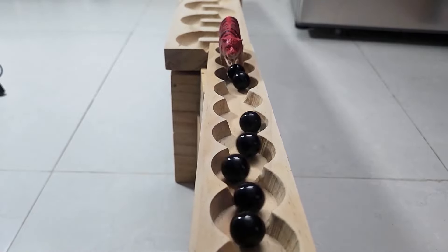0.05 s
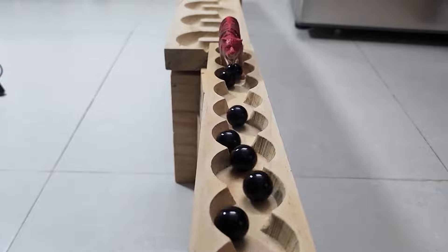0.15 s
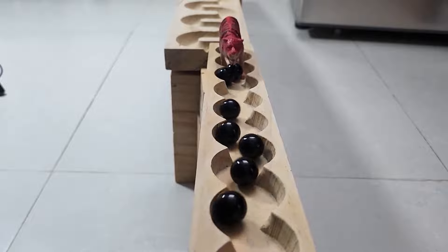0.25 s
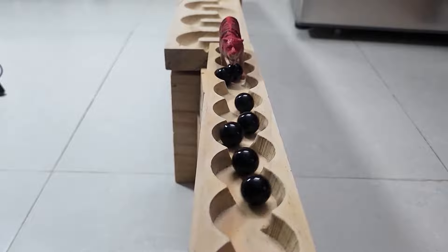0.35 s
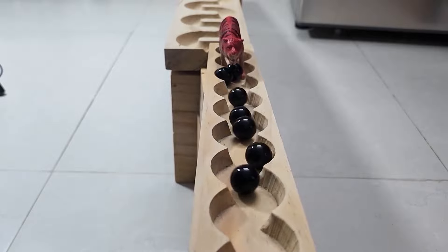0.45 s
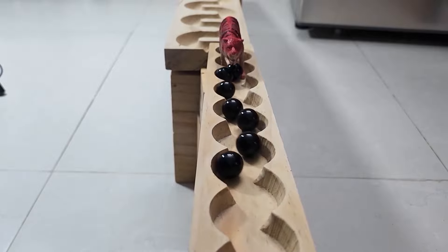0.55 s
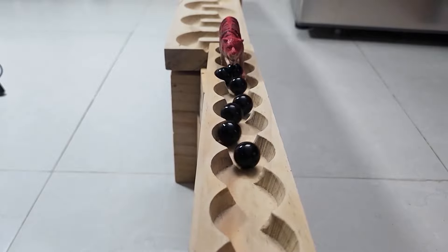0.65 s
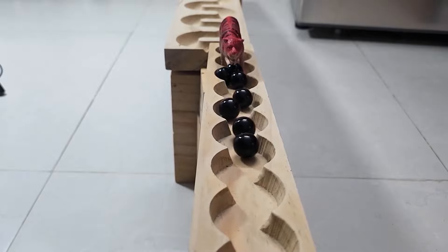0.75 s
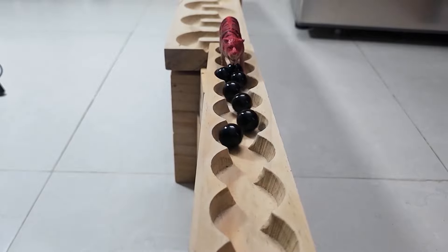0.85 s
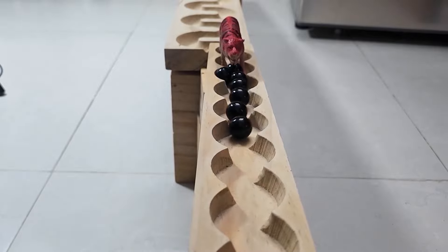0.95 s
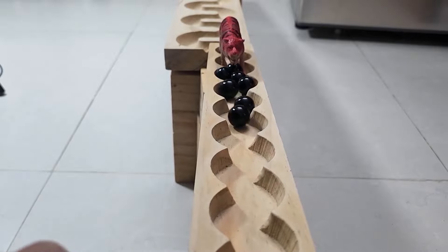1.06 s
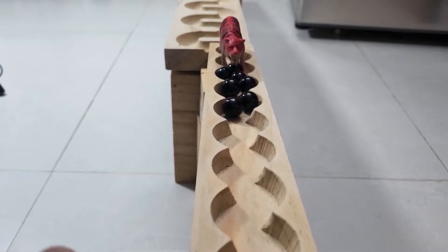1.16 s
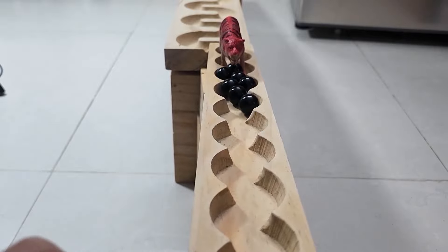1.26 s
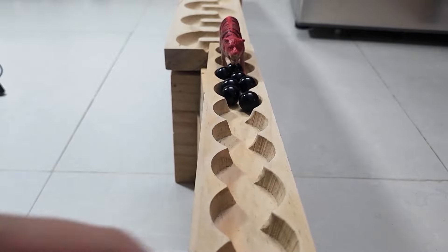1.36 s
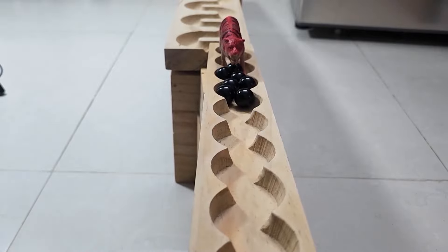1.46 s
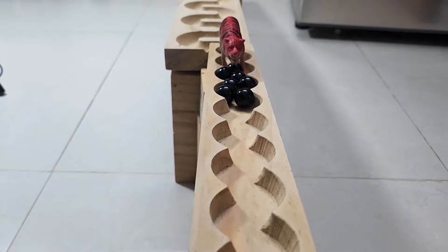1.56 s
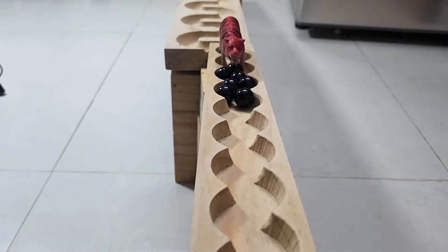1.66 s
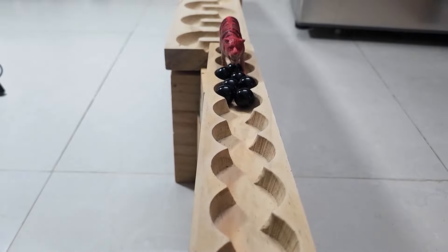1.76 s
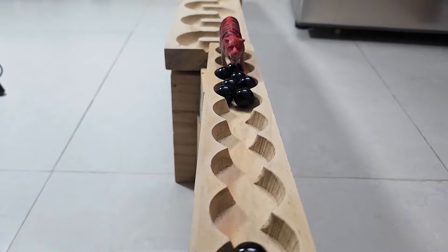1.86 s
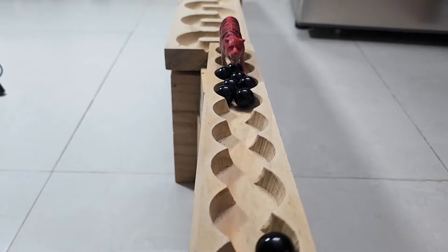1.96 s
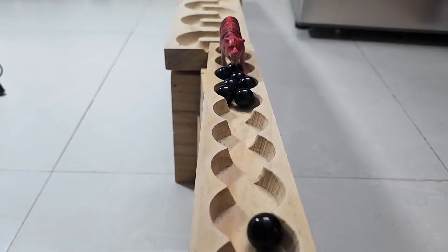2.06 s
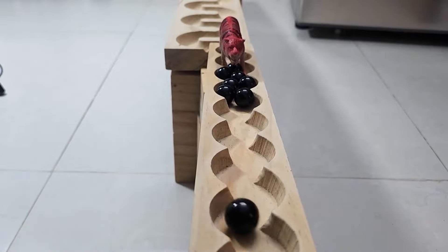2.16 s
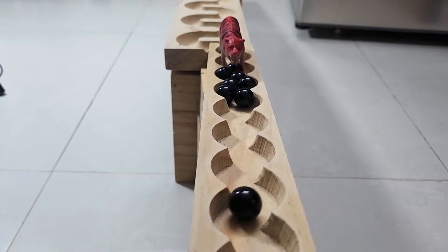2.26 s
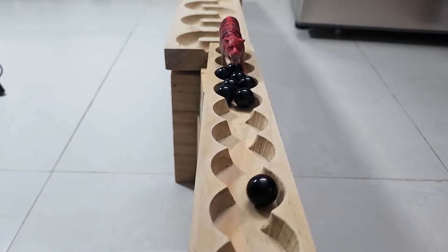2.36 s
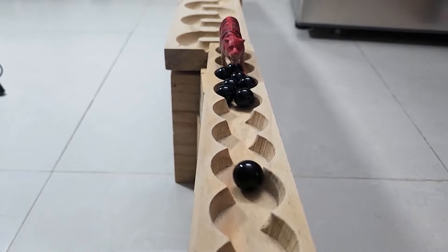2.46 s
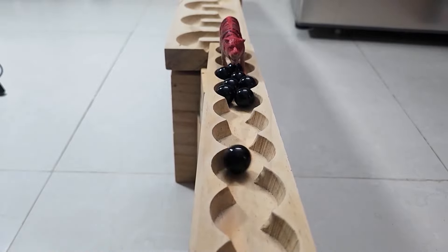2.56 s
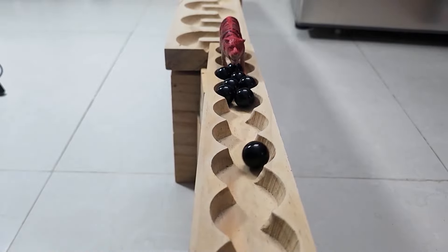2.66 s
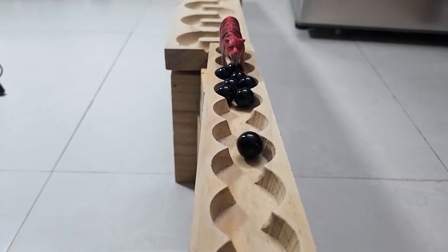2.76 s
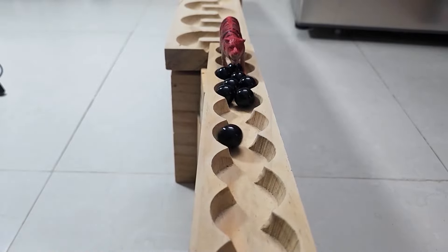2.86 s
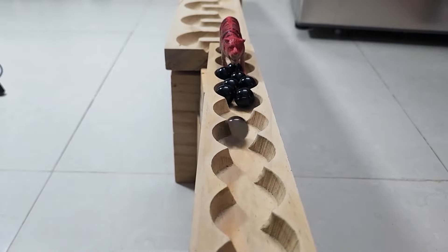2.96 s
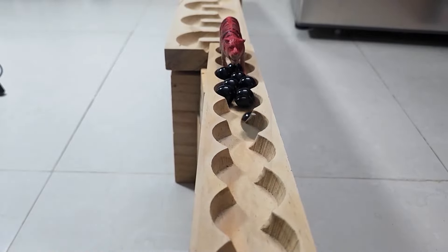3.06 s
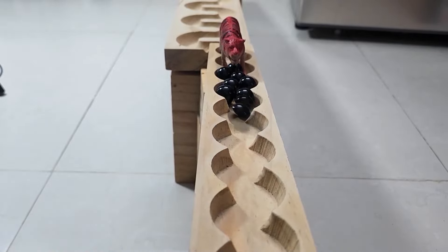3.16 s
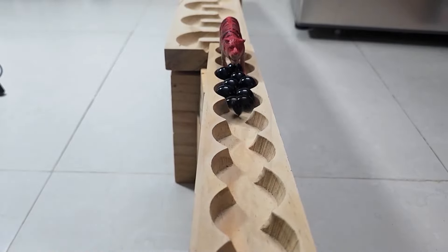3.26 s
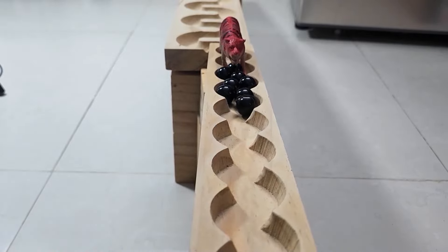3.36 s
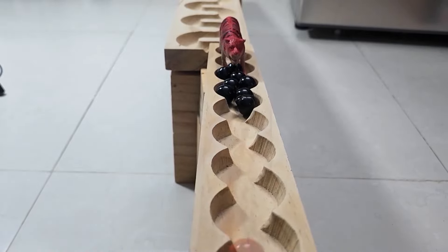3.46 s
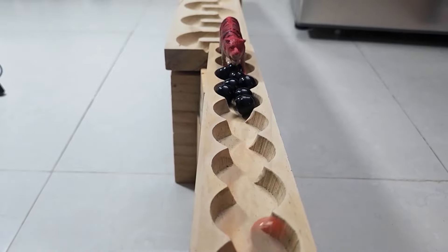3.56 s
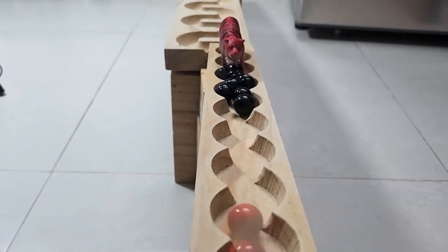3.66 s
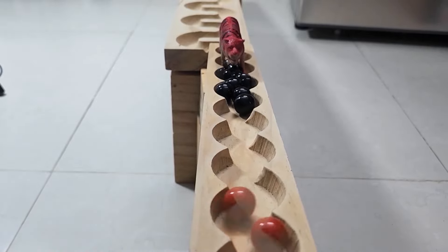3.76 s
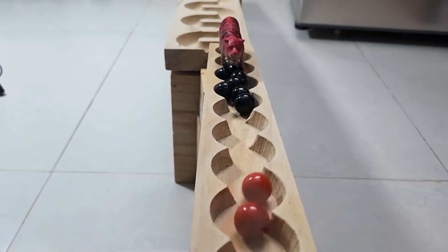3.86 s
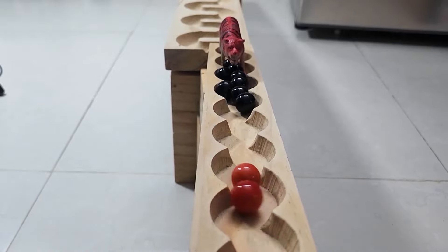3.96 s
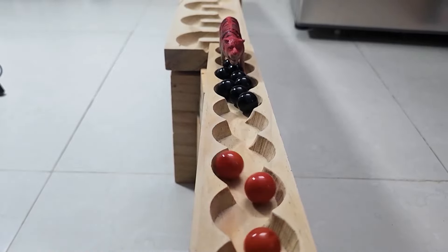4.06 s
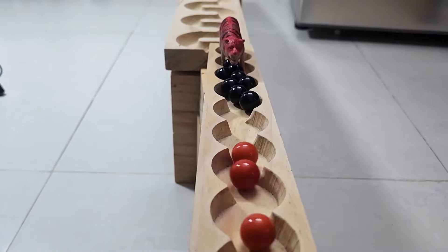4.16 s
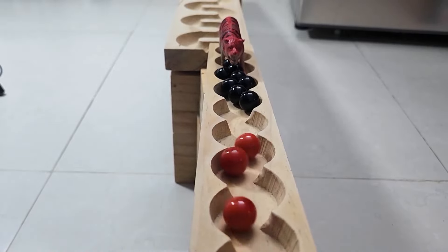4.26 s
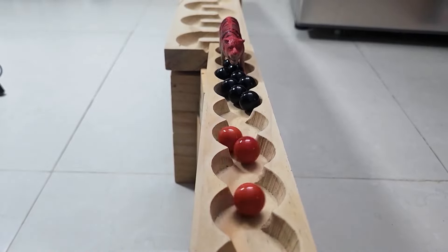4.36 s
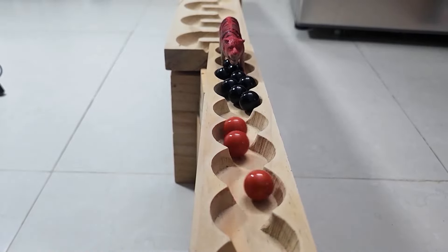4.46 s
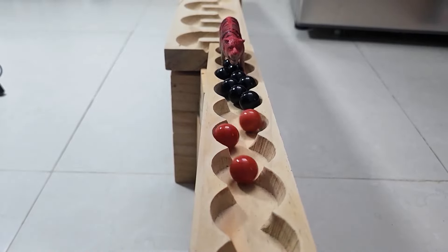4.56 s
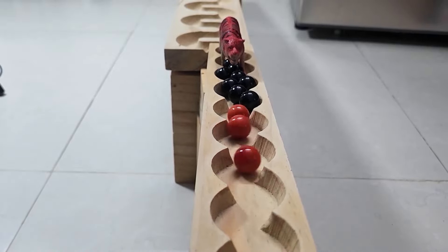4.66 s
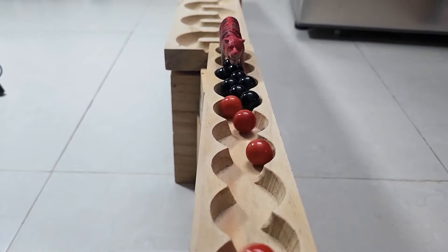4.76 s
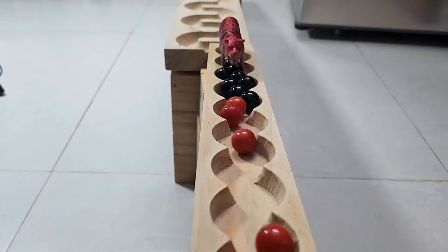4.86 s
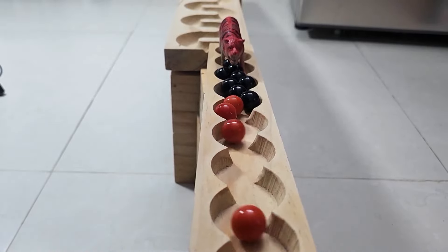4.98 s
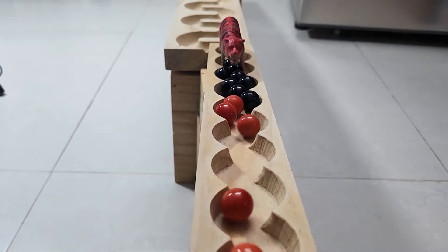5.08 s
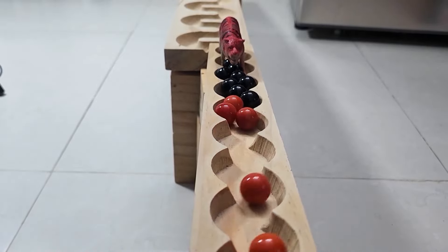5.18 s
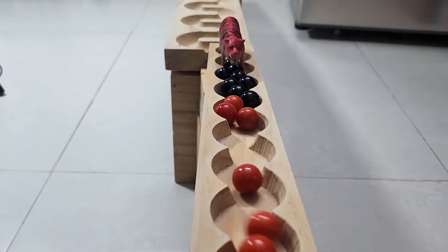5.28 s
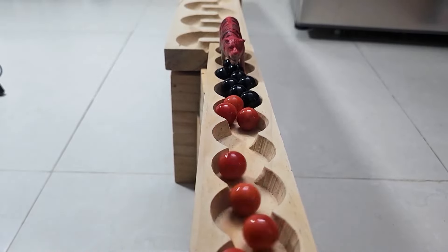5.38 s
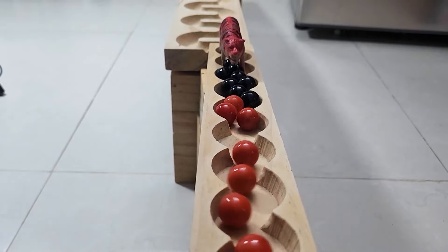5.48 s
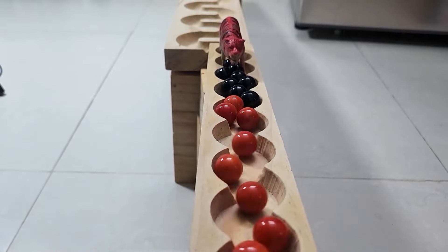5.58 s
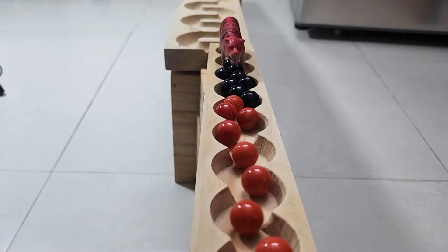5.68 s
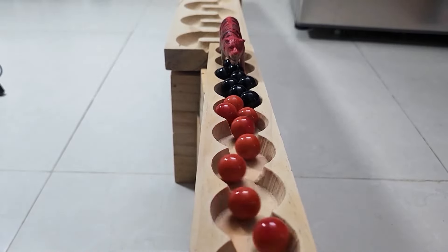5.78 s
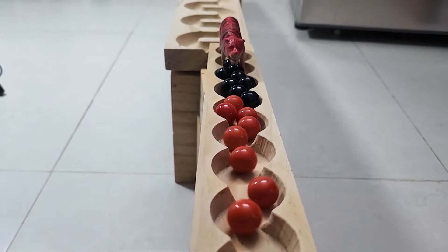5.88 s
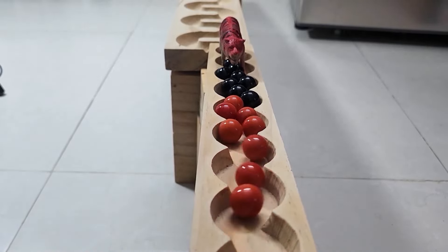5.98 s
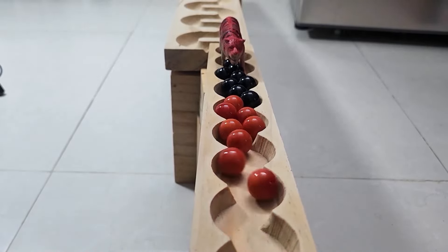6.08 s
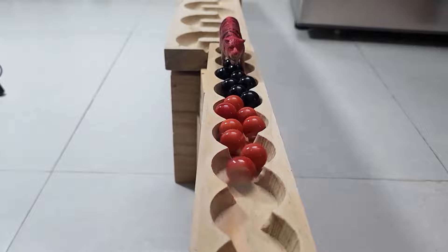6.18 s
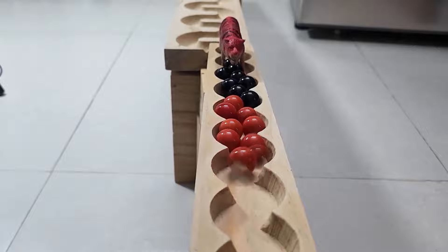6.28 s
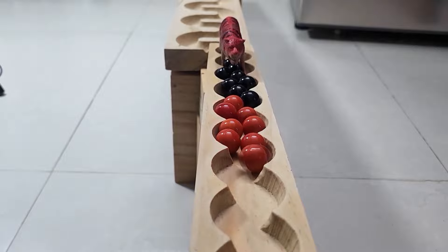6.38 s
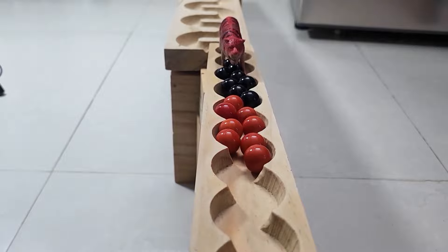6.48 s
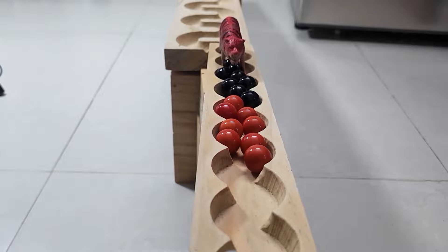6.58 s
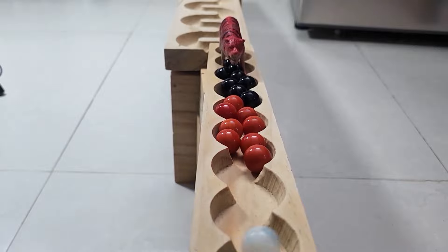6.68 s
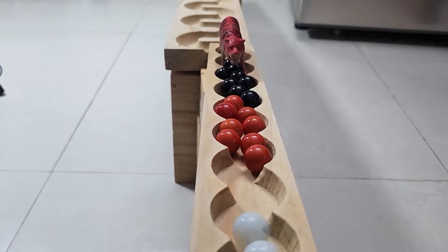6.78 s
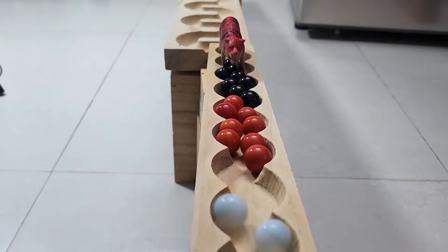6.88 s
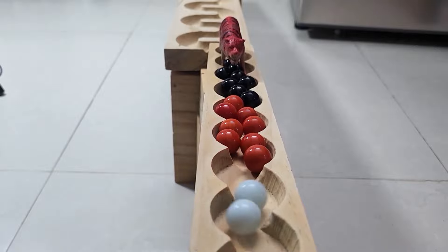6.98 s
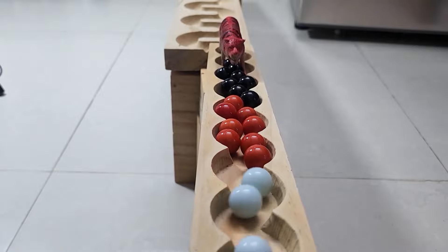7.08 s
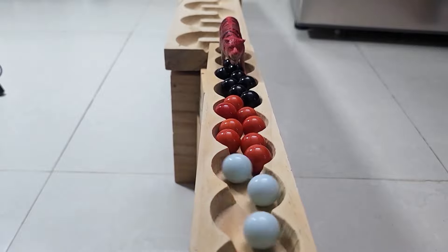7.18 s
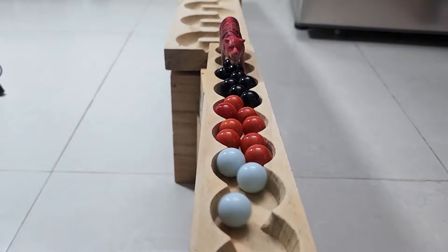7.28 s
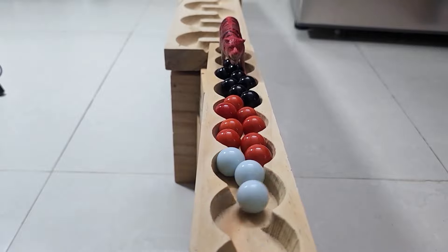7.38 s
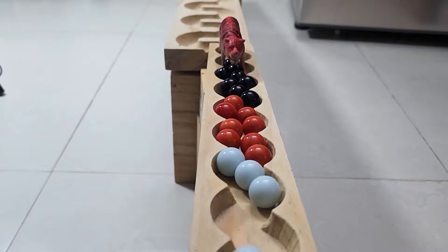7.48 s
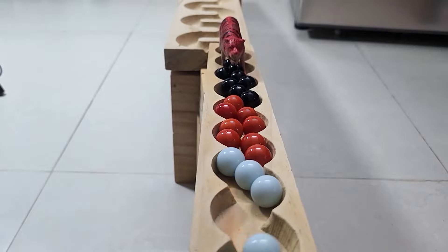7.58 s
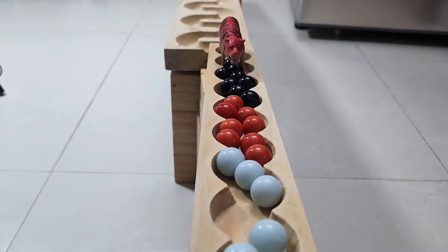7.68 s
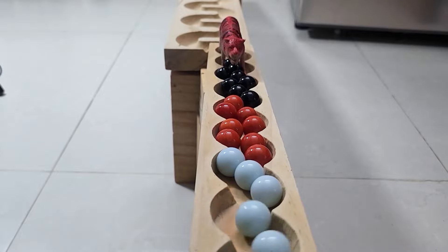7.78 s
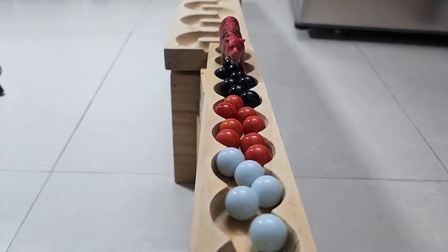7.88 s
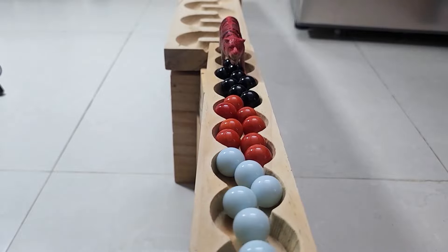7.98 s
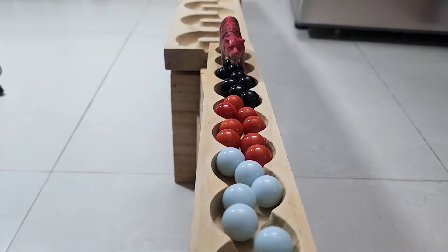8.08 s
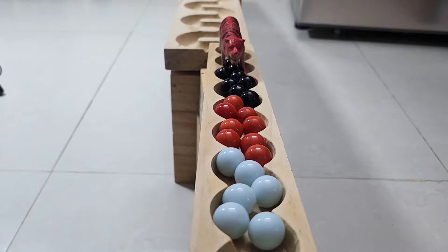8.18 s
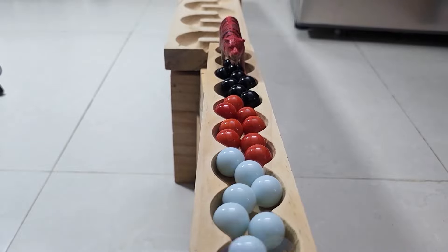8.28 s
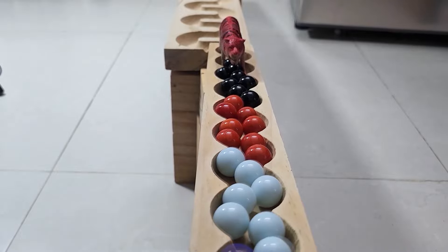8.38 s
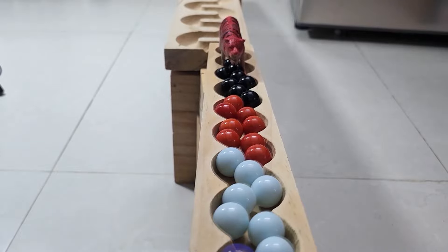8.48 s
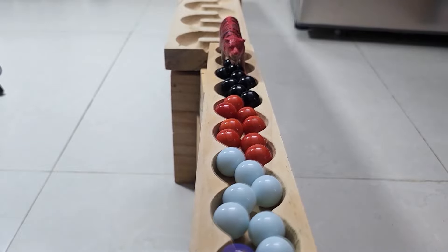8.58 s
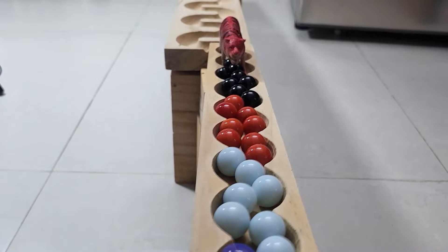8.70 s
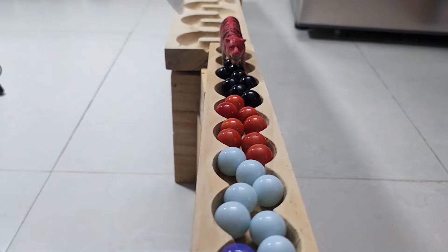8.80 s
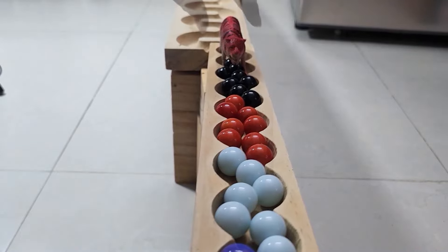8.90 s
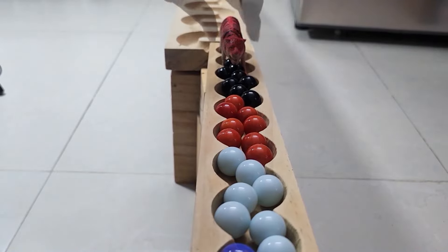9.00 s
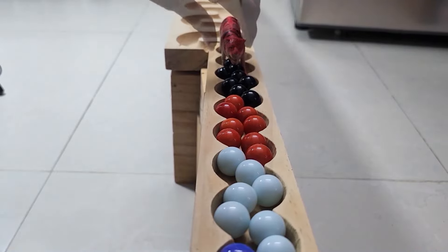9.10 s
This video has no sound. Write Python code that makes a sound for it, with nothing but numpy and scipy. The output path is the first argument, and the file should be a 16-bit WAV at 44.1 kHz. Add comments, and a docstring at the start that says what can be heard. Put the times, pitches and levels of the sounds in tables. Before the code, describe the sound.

Marbles tumble down a wooden zigzag run with quick dry knocks, a faint rumble and sharp glassy clicks as they meet. Between runs, marbles are rummaged and picked from a hollow container, chattering and thudding. New handfuls drop onto the plank and bounce, each run fading as it rolls away. Near stereo microphone, short hard-room reverberation, steady low-humming background.

```python
"""Marbles on a wooden track

Marbles zigzag down a grooved wooden track in a tiled room, close to a stereo microphone.
They rumble along the groove (random tiny impacts through plank resonances), knock on the wall at each bend
(a short push, damped tones and a judder) and click into the queue at the far end (brief bright pulses).
Now and then marbles are stirred and picked from a hollow tub, with chatter, rumble and dull resonant thuds.
A diffuse room tail and steady, low-humming background noise surround them."""
import sys
import numpy as np
from scipy import signal
from scipy.fft import rfft, irfft
from scipy.io import wavfile

SR = 44100
rng = np.random.default_rng(int(sys.argv[2]) if len(sys.argv) > 2 else 0)


def int16_out(signal):
    """Quantize to a 16-bit WAV file."""
    q = np.round(np.clip(np.atleast_2d(signal).T, -1, 1) * 32767)
    wavfile.write(sys.argv[1], SR, q.astype(np.int16))


N = 403074  # length of the scene in samples
SIZE = 4096  # length of one impact and of its filter in samples
T, HZ = np.arange(SIZE) / SR, np.fft.rfftfreq(SIZE, 1 / SR)
EDGE_HZ = 16000  # upper band limit

# Steady background spectrum. Each row: frequency in Hz, relative density in dB per Hz.
AIR_SPECTRUM = [(20, -26), (45, -13), (80, -3), (120, 1.5), (220, -11.5), (300, -7), (600, -5), (1000, -12),
                (2000, -10.5), (4000, -22), (8000, -29.5), (15000, -37)]
AIR_DB = -36.5
# Hums in the background. Each row: frequency in Hz, width in Hz, relative level in dB.
HUM_MODES = [(48.3, 4.5, 11.9), (62.8, 5.6, 5.8), (164.5, 12.3, 7.14), (201.3, 2.6, 8.9), (235, 21.4, 1.3)]
# Left-right likeness of the background. Each row: frequency in Hz, correlation from 0 to 1.
STEREO_LIKENESS = [(40, 0.88), (160, 0.92), (400, 0.92), (1000, 0), (3000, 0)]
# Reverberation of the room. Each row: frequency in Hz, 60 dB decay time in seconds.
ROOM_DECAY = [(200, 0.5), (1000, 0.26), (3000, 0.28), (8000, 0.25), (15000, 0.24)]

# Resonances of the whole plank. Each row: frequency in Hz, width in Hz, relative level in dB.
PLANK_MODES = [(1062, 76, 1.5), (1408, 100, -0.5), (1700, 1500, -43), (2387, 230, 0), (2480, 290, -7),
               (2655, 107, 2.5), (3590, 88, -5.5), (3994, 92, -0.5), (4830, 390, -20.5), (5110, 170, -3.5),
               (5360, 740, -14.5), (7050, 450, -12.5)]
# Tones of one hollow bend of the groove.
# Each row: frequency in Hz, relative level in dB, 60 dB decay time in seconds.
BEND_TONES = [(1317, -16, 0.038), (2418, -11, 0.035), (2685, -2, 0.043), (3866, -7, 0.036),
              (4080, -1.5, 0.025), (4460, -12, 0.023), (4850, -13, 0.033), (5630, -17, 0.054),
              (6600, -16.5, 0.03), (7710, -10.5, 0.018)]
# Resonances of the tub. Each row: frequency in Hz, width in Hz, relative level in dB.
TUB_MODES = [(386, 69, 5), (520, 37, 8), (710, 61, 8), (880, 670, 7), (1170, 190, 3), (1500, 250, -30),
             (2240, 2400, 1.5), (3200, 1500, -16.5)]
# Lingering tones of the tub. Each row: frequency in Hz, relative level in dB, 60 dB decay time in seconds.
TUB_TONES = [(484.6, -11.5, 0.13), (636, -60, 0.07), (674, -9.5, 0.12)]

# Batches of marbles rolling down the track.
# Each row: start in seconds, length in seconds, relative rumble level in dB.
ROLLING_RUNS = [(0, 1.55, -30), (2.351, 1.09, -40), (3.54, 1.28, -33.5), (4.678, 1.76, -30.5),
                (6.78, 0.7, -32.5), (7.498, 0.67, -40)]
# The rumble fades as a batch rolls away, and stops when it joins the queue.
AWAY_DB_PER_S, STOP_S, STOP_DB = 9.5, 0.21, 11

# Bright zings set off by knocks. Each row: start in seconds, level in dB.
ZING_EVENTS = [(0.001, -31), (0.668, -24.5), (2.687, -25.5)]
# Marbles hitting the wall of a bend.
# Each row: start in seconds, level in dB, hardness as relative treble in dB.
WALL_KNOCKS = [(0.064, -27, -3), (0.090, -24, -11), (0.138, -19, -3), (0.177, -20.5, 0), (0.2836, -29, 7),
               (0.3227, -24, -19), (0.415, -23, -0.5), (0.4816, -19, -2.5), (0.493, -18.5, -9),
               (0.663, -18, -7), (0.686, -24, 9), (0.771, -23, -5), (0.814, -18.5, -18),
               (0.855, -26.5, -28), (0.933, -26.5, -4), (0.991, -18, -7), (1.1127, -20, -14),
               (1.131, -22, -4), (1.182, -21, -25), (1.282, -21, -13), (1.3951, -23.5, -18),
               (2.345, -24, -4), (2.509, -22, 1.5), (2.685, -17.5, 7), (3.018, -24.5, -8), (3.083, -33, -3),
               (3.1922, -24, -14), (3.373, -22, -7), (3.654, -26, -8), (3.700, -21.5, 6),
               (3.863, -24.5, -5.5), (3.882, -31, -14), (4.02, -23, -3), (4.082, -28.5, -14),
               (4.164, -23, 0), (4.199, -23.5, -2), (4.235, -25.5, -1), (4.358, -23, -8), (4.373, -21, -4),
               (4.434, -26, -14), (4.529, -22.5, -2.5), (4.567, -22, -5), (4.818, -28, 10), (4.833, -27, 7),
               (4.8573, -17.5, 2), (4.8674, -16, 5), (5.038, -22.5, 5), (5.073, -22, 9), (5.16, -25, -5),
               (5.338, -12.5, 8), (5.368, -17, 17), (5.390, -15, 13), (5.434, -21.5, -7), (5.465, -22, 4),
               (5.508, -22.5, -13), (5.558, -21, 7.5), (5.6121, -18.5, -6.5), (5.754, -28.5, -7),
               (5.796, -23.5, -0.5), (5.845, -23, -2), (5.874, -24.5, 2), (5.911, -20, 2),
               (6.046, -18.5, -7), (6.1891, -20.5, -2), (6.340, -20, 4), (6.848, -22, -1.5),
               (7.150, -20, 2.5), (7.285, -21.5, 9), (7.335, -19, 4), (7.418, -23.5, -2),
               (7.578, -21.5, 17), (7.6877, -18, -1), (7.818, -33, 4), (7.878, -29.5, 17),
               (7.978, -24.5, -13), (8.059, -25.5, 4), (8.128, -35, -3), (8.401, -30, 4)]
# A glancing knock has little body, more when it is hard; the marble then rebounds softly off the facing wall.
GLANCE_BODY, BODY_PER_HARDNESS = -6, 0.27
REBOUND_S, REBOUND_LOSS_DB = 0.018, 11.5
# Light knocks fall at random moments of every run.
LIGHT_DB, LIGHT_HARD_DB = -32.5, -7.5
# Marbles dropped on the plank, which bounce.
# Each row: start in seconds, level in dB, first hop in seconds, hardness as relative treble in dB.
PLANK_DROPS = [(3.545, -21, 0.021, 1), (3.566, -18, 0.031, -10), (4.680, -15, 0.041, -10.5),
               (4.748, -15, 0.05, -6), (5.210, -12.5, 0.042, -3.5), (5.253, -14, 0.017, -2.5),
               (5.3207, -12, 0.018, -4), (6.7774, -19.5, 0.029, -8), (6.906, -21.5, 0.04, -9),
               (7.4781, -17.5, 0.061, -13), (7.5545, -15, 0.065, -20), (7.650, -15, 0.092, -14)]
# Each hop is a share of the last and lands weaker; a landing is square, with much body.
HOP_SHARE, HOP_LOSS_DB, LANDING_BODY = 0.94, 8, 7.5

# Marble against marble. Each row: start in seconds, level in dB, relative room share in dB.
MARBLE_CLICKS = [(0.1019, -15, 0.5), (0.857, -24.5, 4), (1.110, -32.5, 12.5), (1.215, -24.5, 7),
                 (1.3948, -21, -1), (1.426, -23.5, -3), (1.445, -28, -1), (1.577, -27.5, 3.5),
                 (1.708, -18.5, 3), (1.799, -28, 3), (1.942, -19.5, -9), (2.197, -15.5, 4),
                 (2.322, -25, -4), (2.407, -27, 7.5), (2.597, -23, 8), (2.872, -28.5, 10),
                 (2.888, -18.5, -16), (3.467, -24.5, 6.5), (3.634, -16.5, -3), (3.674, -21.5, 2),
                 (3.75, -30, 5.5), (3.993, -23, 1.5), (4.226, -24, -5), (4.252, -14.5, -6),
                 (4.821, -19, 8.5), (4.910, -22, 1), (4.986, -22, -2), (5.275, -20, -19), (5.310, -18, 7),
                 (5.332, -24, 5), (5.374, -12, -3), (5.385, -11.5, -2), (5.412, -20.5, 1),
                 (5.873, -22.5, -8), (6.051, -26, 6.5), (6.169, -22.5, 3), (6.389, -16, 3), (6.401, -21, 7),
                 (6.425, -13, 4), (6.438, -15.5, 4), (6.569, -20, 7.5), (6.682, -17, -4.5), (7.006, -17, 0),
                 (7.021, -19, -8), (7.235, -21.5, -9), (7.2738, -16, -6), (7.347, -21.5, 1),
                 (7.4206, -18.5, -5), (7.527, -15.5, -1), (7.570, -20.5, -12), (7.665, -14, 2),
                 (7.694, -17, 2.5), (7.860, -26, -1), (7.901, -26.5, -11), (7.963, -21, -5),
                 (8.0446, -17, -8), (8.1458, -28, -2), (8.1595, -26.5, 1), (8.2573, -25.5, -1),
                 (8.2815, -23.5, -3), (8.4478, -31.5, -8)]
# Clicks centre near one pitch; those on the track lean left, those in the tub right (left over right, dB).
CLICK_HZ, CLICK_OCTAVES, TRACK_LEAN_DB, TUB_LEAN_DB = 8980, 0.11, 5, -2.5
# Marbles settle in the tub for a while after a handful; light clicks are scattered over every run.
SETTLE_S, LIGHT_CLICK_DB, LIGHT_ROOM_DB = 0.3, -33.5, -15

# A hand stirs the tub. Each row: start in seconds, swell in seconds, fade in seconds,
# relative chatter level in dB, relative rumble level in dB.
TUB_HANDFULS = [(1.70, 0.1, 0.069, -30, -30.5), (1.82, 0.14, 0.082, -17.5, -25),
                (2.118, 0.11, 0.18, -14.5, -33.5), (2.78, 0.099, 0.085, -22, -32),
                (6.29, 0.17, 0.092, -20, -33.5)]
# How far below its crest a handful starts and ends.
CHATTER_SWELL_DB, RUMBLE_SWELL_DB, CHATTER_FADE_DB, RUMBLE_FADE_DB = 27.5, 5, 25.5, 12.5
# Marbles shift on the floor before they spill over each other: the rumble crests at this share of the swell.
RUMBLE_CREST_SHARE = 0.64
# Marbles bumping in the tub. Each row: start in seconds, blow level in dB, relative after-ring in dB.
TUB_THUDS = [(1.797, -29.5, -8), (1.866, -26, 10), (1.905, -26, 7), (1.943, -23.5, -1), (2.143, -24, -3),
             (2.1875, -22, -14), (2.2103, -23, -1), (2.278, -24.5, -8), (2.375, -23, -29),
             (2.401, -21.5, -7), (2.590, -16.5, -10.5), (2.646, -29, -19), (2.729, -26, -10),
             (2.761, -21.5, -30), (6.411, -25.5, -4), (6.570, -11.5, 9.5)]


def amp(db):
    """Amplitude ratio: twenty decibels are a factor of ten."""
    return 10 ** (np.asarray(db) / 20)


def evened(x):
    """Normalisation of power: the sound is scaled to rms 1."""
    return x / np.sqrt(np.mean(x ** 2) + 1e-20)


def at_level(sound, db, count):
    """Onset level: the rms of the first count samples is set in dB."""
    return sound * amp(db) / np.sqrt(np.mean(sound[:, :count] ** 2))


def read(points, hz):
    """Logarithmic interpolation: a spectrum is read along a log-frequency axis."""
    f, value = np.transpose(points)
    return np.interp(np.log(hz + 1), np.log(f + 1), value)


def add(mix, s, sound):
    """Superposition: a stereo sound is added to the mix at s seconds."""
    part = mix[:, max(round(s * SR), 0):][:, :sound.shape[1]]
    part += sound[:, :part.shape[1]]


def panned(lean_db):
    """Level difference between the ears: left and right gains, positive to the left."""
    return amp([[lean_db / 2], [-lean_db / 2]])


def played(curves):
    """Envelope: gain over time from lists of (seconds, dB), silent outside them."""
    t = np.arange(N) / SR
    gains = [amp(np.interp(t, *np.transpose(points), left=-np.inf, right=-np.inf)) for points in curves]
    return sum(gains)


def peaks(modes, hz):
    """Resonance: the powers of the bell-shaped modes add up."""
    return np.sqrt(sum(amp(db) ** 2 / (1 + (2 * (hz - f) / width) ** 2) for f, width, db in modes))


def above(edge_hz, hz=HZ, order=2):
    """Radiation: small bodies radiate little bass, a high-pass gain."""
    return 1 / np.sqrt(1 + (edge_hz / (hz + 1)) ** (2 * order))


def hump(centre_hz, octaves, skirt_db):
    """Impact spectrum: a bell on a flat skirt, lying higher the shorter the contact."""
    bell = np.exp(-0.5 * (np.log2((HZ + 1) / centre_hz) / octaves) ** 2)
    return bell + amp(skirt_db)


def colour(x, gain):
    """Minimum phase: a causal filter of the given gain, so that resonances ring after the blow."""
    cepstrum = irfft(np.log(np.maximum(gain, 1e-5)))
    # Folding the cepstrum onto positive times makes the filter causal.
    cepstrum[1:SIZE // 2] *= 2
    cepstrum[SIZE // 2 + 1:] = 0
    response = irfft(np.exp(rfft(cepstrum)))
    return signal.oaconvolve(x, response[None], axes=1)[:, :x.shape[1]]


def scatter(t60):
    """Multipath: dying noise of energy 1 a channel, as many short paths through wood and air."""
    paths = rng.standard_normal((2, SIZE)) * amp(-60 * T / t60)
    return paths / np.linalg.norm(paths, axis=1, keepdims=True)


def contact(lag):
    """Impulse and arrival time: one sharp push, lag seconds later at the left microphone than the right."""
    delay = np.array([[max(lag, 0)], [max(-lag, 0)]])
    return np.sinc((T - T[8] - delay) * SR)


def ringing(modes, detune, uneven_db, rise_s):
    """Modal decay: the place of the blow changes pitch and strength, and phase at each microphone."""
    hz, db, t60 = np.transpose(modes)[:, :, None, None]
    t = np.arange(2 * SIZE) / SR
    hz = hz * (1 + detune * rng.standard_normal(hz.shape))
    db = db + uneven_db * rng.standard_normal(db.shape)
    # Phase in turns: the microphones disagree more at high frequency.
    apart = rng.uniform(-1.04, 1, (len(hz), 2, 1)) * np.minimum(hz / 6000, 0.5)
    phase = rng.random(hz.shape) + apart
    tones = amp(db - 60 * t / t60) * np.sin(2 * np.pi * (hz * t + phase))
    return tones.sum(0) * np.minimum(t / rise_s, 1)


def grains(per_s, spread_db):
    """Random arrivals: tiny impacts of uneven size and sign."""
    size = amp(spread_db * np.minimum(rng.exponential(1, N), 4))
    return size * rng.choice([-1, 1], N) * (rng.random(N) < per_s / SR)


def patter(per_s, spread_db, t60, gain):
    """Excitation and filter: a stream of tiny impacts heard through one body, rms 1."""
    impacts = grains(per_s, spread_db)[None]
    spread = signal.oaconvolve(impacts, scatter(t60), axes=1)[:, :N]
    return evened(colour(spread, gain))


def moments(count):
    """Stratified chance: count random times spread through each run."""
    return [s + length * (k + rng.random()) / count for s, length, _ in ROLLING_RUNS for k in range(count)]


def background():
    """Partly coherent noise: steady room noise, alike left and right in the bass, with a few low hums."""
    hz = np.fft.rfftfreq(N, 1 / SR)
    a, b = rfft(rng.standard_normal((2, N)))
    same = np.clip(read(STEREO_LIKENESS, hz), 0, 1)
    pair = np.array([a, same * a + np.sqrt(1 - same ** 2) * b])
    hums = peaks(HUM_MODES, hz) * amp(read([(240, 3), (400, -25)], hz))
    gain = np.hypot(amp(read(AIR_SPECTRUM, hz)), hums) * above(41, hz, order=5)
    return amp(AIR_DB) * evened(irfft(pair * gain, N)) * panned(-0.43)


def runs():
    """Attenuation with distance: each batch fades steadily in dB, then stops."""
    curves = []
    for s, length, db in ROLLING_RUNS:
        far_db = db - AWAY_DB_PER_S * length
        curves.append([(s, db), (s + length, far_db), (s + length + STOP_S, far_db - STOP_DB)])
    return curves


def rolling(level_db=-1, body_db=3, hard_db=-3):
    """Roughness excitation: the grain of the wood shakes each marble, which drums lightly on the track."""
    tilt = read([(500, body_db + 17.0), (1600, body_db), (2600, 0.5), (3800, hard_db)], HZ)
    plank = peaks(PLANK_MODES, HZ) * above(266) * amp(tilt)
    rumble = patter(per_s=450, spread_db=6.5, t60=0.0028, gain=plank)
    return rumble * amp(level_db) * played(runs())


def zings(zing_hz=5600, octaves=0.12, t60=0.08):
    """Narrow-band decay: dying noise in one bright band rings above the knock."""
    out = np.zeros((2, N))
    for s, db in ZING_EVENTS:
        zing = colour(scatter(t60), hump(zing_hz, octaves, skirt_db=-27))
        add(out, s, at_level(zing, db, count=265))
    return out


def blows(count=4):
    """Impact and restitution: each drop, knock, rebound and light knock on wood.

    Yields start in seconds, level in dB, relative body, hardness in dB; count is the landings of a drop."""
    for s, db, hop_s, hard_db in PLANK_DROPS:
        for k in range(count):
            yield s, db - HOP_LOSS_DB * k, LANDING_BODY, hard_db
            s += hop_s * HOP_SHARE ** k
    for s, db, hard_db in WALL_KNOCKS:
        body = GLANCE_BODY + BODY_PER_HARDNESS * hard_db
        yield s, db, body, hard_db
        yield s + REBOUND_S * rng.uniform(0.6, 1.3), db - REBOUND_LOSS_DB, body, LIGHT_HARD_DB
    for s in moments(count=5):
        yield s, LIGHT_DB + 2 * rng.standard_normal(), GLANCE_BODY, LIGHT_HARD_DB


def knocks(tock_hz=1300, tock_db=-7, tock_slope=0.65, judder_db=-16, judder_t60=0.28, hops_per_s=420, lean_db=-2):
    """Impact on a resonator: a short tock, the ringing hollow of the bend and a judder along the plank."""
    out, plank = np.zeros((2, N)), peaks(PLANK_MODES, HZ) * above(160)
    low_wall = amp(-6.5) * hump(432, octaves=0.49, skirt_db=-46)
    wall = (hump(tock_hz, octaves=0.37, skirt_db=-22.5) + low_wall) * above(170)
    for s, db, body, hard_db in blows():
        tilt = read([(1700, body * 0.04), (2300, 0), (2900, 0.015), (3800, hard_db * 0.54), (6000, hard_db)], HZ)
        tones = ringing(BEND_TONES, detune=0.02, uneven_db=1.0, rise_s=0.00047)[:, :SIZE]
        bend = at_level(tones, 0, count=265)
        push = contact(rng.uniform(-0.000088, 1e-4)) + amp(-1.5) * scatter(0.0093)
        # Square blows are mostly tock.
        tock = at_level(colour(push, wall), tock_db + tock_slope * body, count=265)
        # Small rebounds at random moments shake the plank and die away.
        hops = rng.choice([-1, 1], SIZE) * (rng.random(SIZE) < hops_per_s / SR) * amp(-60 * T / judder_t60)
        shaking = signal.oaconvolve(hops[None], scatter(0.0069), axes=1)[:, :SIZE]
        judder = at_level(colour(shaking, plank), judder_db, count=SIZE)
        knock = at_level(colour(bend + tock + judder, amp(tilt)), db, count=265)
        add(out, s, knock * panned(lean_db + 1.86 * rng.standard_normal()))
    return out


def collisions():
    """Brief elastic contact: every meeting of two marbles, on the track or in the tub.

    Yields start in seconds, level in dB, centre in Hz, left-right lean in dB, relative room share in dB."""
    light = [(s, LIGHT_CLICK_DB, LIGHT_ROOM_DB) for s in moments(count=2)]
    for s, db, room_db in MARBLE_CLICKS + light:
        in_tub = any(start < s < start + swell + fade + SETTLE_S for start, swell, fade, _, _ in TUB_HANDFULS)
        centre_hz = CLICK_HZ * 2 ** (CLICK_OCTAVES * rng.standard_normal())
        yield s, db, centre_hz, TUB_LEAN_DB if in_tub else TRACK_LEAN_DB, room_db


def clicks(spray_db=3, spray_t60=0.018, echo_db=-7, echo_t60=0.045, top_db=-4, top_db_per_octave=22):
    """Pulse and early reflection: sharp clicks with groove echoes, returned direct and as sent to the room."""
    direct, sent = np.zeros((2, 2, N))
    for s, db, centre_hz, lean_db, room_db in collisions():
        # Only the briefest contacts reach the top octave.
        treble_db = top_db + top_db_per_octave * np.log2(centre_hz / 8400)
        tilt = read([(5000, 4.5), (6300, 2.5), (8200, 5.5), (10300, treble_db), (15500, treble_db + 0.5)], HZ)
        edge = amp(tilt) * above(2900)
        reflections = amp(spray_db) * scatter(spray_t60) + amp(echo_db) * scatter(echo_t60)
        blow = contact(rng.uniform(-0.00016, 1e-4)) + reflections
        click = at_level(colour(blow, hump(centre_hz, octaves=0.58, skirt_db=-5.0) * edge), db, count=132)
        add(direct, s - T[8], click * panned(lean_db))  # the push peaks at T[8]
        add(sent, s, click * amp(room_db))
    return direct, sent


def handfuls():
    """Envelopes of agitation: chatter and rumble swell to a crest and die away, the rumble cresting first."""
    chatter, rumble = [], []
    for s, swell, fade, chatter_db, rumble_db in TUB_HANDFULS:
        crest, end = s + swell, s + swell + fade
        early_crest = s + swell * RUMBLE_CREST_SHARE
        chatter.append([(s, chatter_db - CHATTER_SWELL_DB), (crest, chatter_db), (end, chatter_db - CHATTER_FADE_DB)])
        rumble.append([(s, rumble_db - RUMBLE_SWELL_DB), (early_crest, rumble_db), (end, rumble_db - RUMBLE_FADE_DB)])
    return played(chatter), played(rumble)


def stirring(chatter_db=-3, rumble_db=-1, chatter_hz=7000, dull_hz=1500):
    """Many random collisions: marbles chatter against each other and rumble on the floor of the tub."""
    bright = hump(chatter_hz, octaves=1.5, skirt_db=-38) * above(1400)
    hollow = peaks(TUB_MODES, HZ) * above(340) / np.hypot(1, HZ / dull_hz)
    chatter = patter(per_s=520, spread_db=6.5, t60=0.022, gain=bright)
    rumble = patter(per_s=800, spread_db=3.5, t60=0.0082, gain=hollow)
    chatter_gain, rumble_gain = handfuls()
    return amp(chatter_db) * chatter_gain * chatter + amp(rumble_db) * rumble_gain * rumble


def thuds(rattle_db=4, rattle_t60=0.12, soft_hz=2200, lean_db=-3):
    """Cavity and wall resonance: dull blows on the hollow tub, whose walls rattle and ring on after freer ones."""
    out, hollow = np.zeros((2, N)), peaks(TUB_MODES, HZ) * above(143) / np.hypot(1, HZ / soft_hz)
    for s, db, ring_db in TUB_THUDS:
        rattle = scatter(rattle_t60)
        shared = rattle + 0.5 * rattle[::-1]  # each side hears half of the other
        blow = contact(5e-5) + amp(rattle_db + ring_db) * shared
        add(out, s, at_level(colour(blow, hollow), db, count=265))
        tones = ringing(TUB_TONES, detune=0.0017, uneven_db=0.5, rise_s=0.0012)
        add(out, s, amp(db + ring_db) * tones)
    return out * panned(lean_db)


def room(x, build_s=0.00079):
    """Diffuse reverberation: a tail that builds up quickly, each band dying at its own speed."""
    hz, t, z = signal.stft(rng.standard_normal((2, SR // 2)), SR, nperseg=256)
    decay = amp(-60 * t / read(ROOM_DECAY, hz)[:, None])
    tail = signal.istft(z * decay, SR, nperseg=256)[1]
    tail *= np.minimum(np.arange(tail.shape[1]) / SR / build_s, 1)
    return signal.fftconvolve(x, tail / np.linalg.norm(tail[0]), axes=1)[:, :N]


def scene(wood_room_db=-6, click_room_db=-6, tub_room_db=-9):
    """Superposition of direct and reverberant sound: track, marbles and tub in one room."""
    wood = rolling() + zings() + knocks()
    click, click_sent = clicks()
    tub = stirring() + thuds()
    wet = room(amp(wood_room_db) * wood + amp(click_room_db) * click_sent + amp(tub_room_db) * tub)
    return background() + wood + click + tub + wet


def record(dry):
    """Saturation and band limit: the loudest peaks clip at full scale, then a low-pass follows."""
    low_pass = signal.firwin(255, EDGE_HZ, window=("kaiser", 8), fs=SR)
    return signal.oaconvolve(np.clip(dry, -1, 1), low_pass[None], "same")


dry = scene()
out = record(dry)
int16_out(out)
```